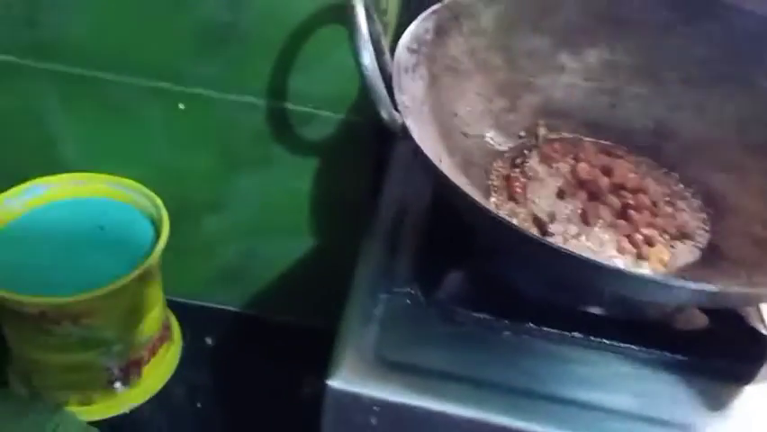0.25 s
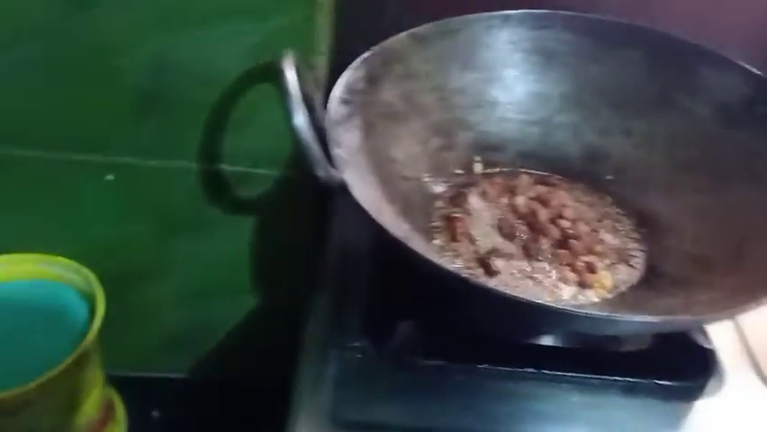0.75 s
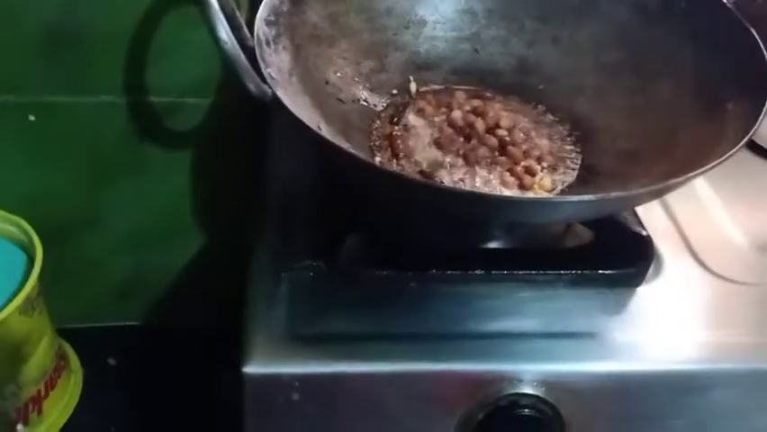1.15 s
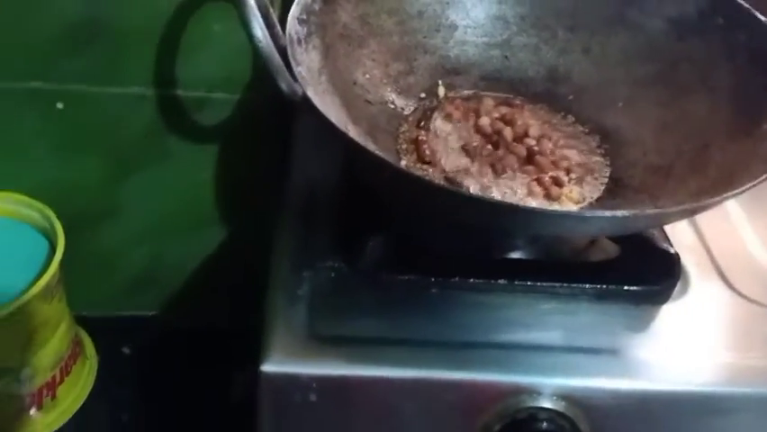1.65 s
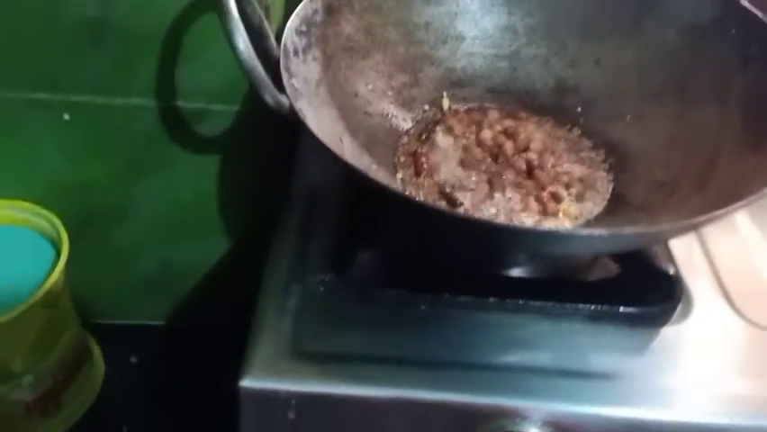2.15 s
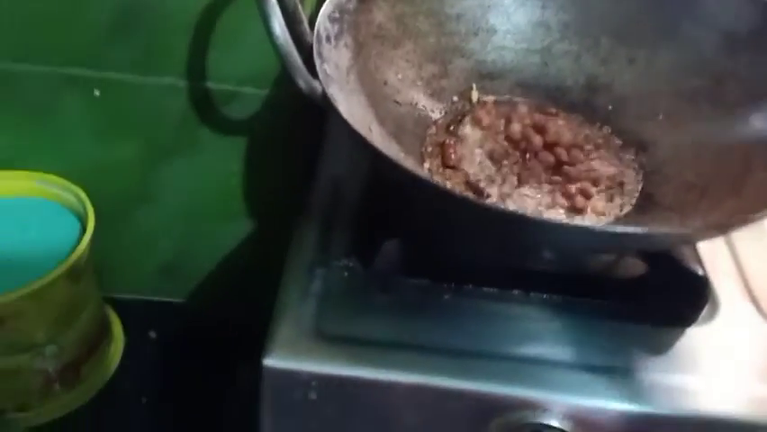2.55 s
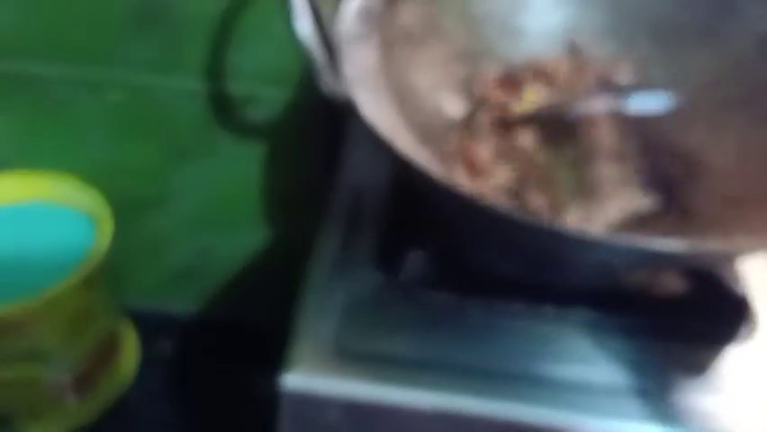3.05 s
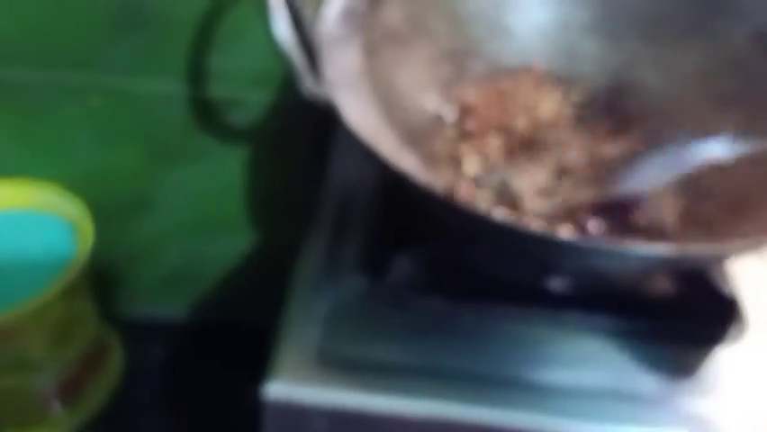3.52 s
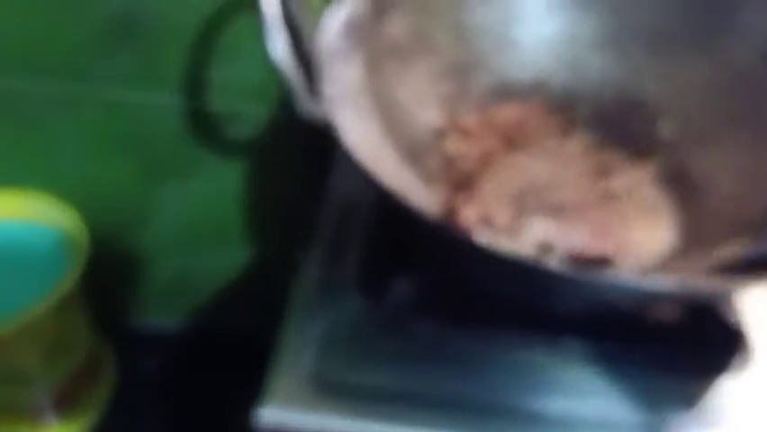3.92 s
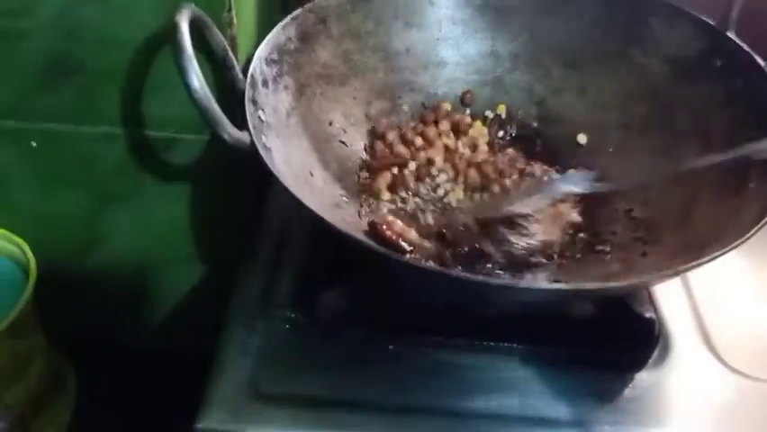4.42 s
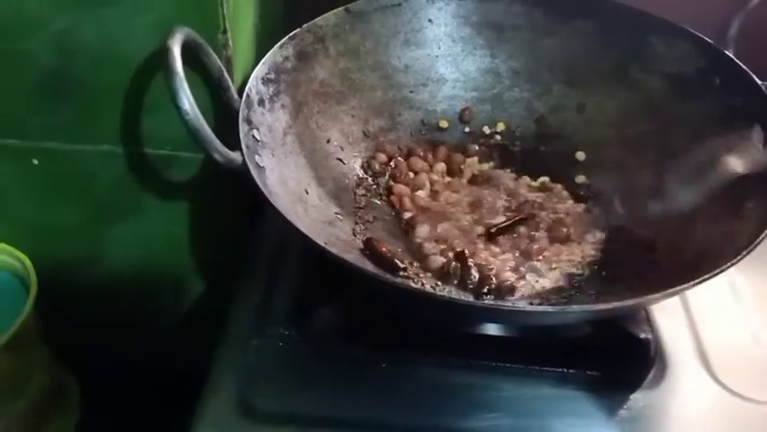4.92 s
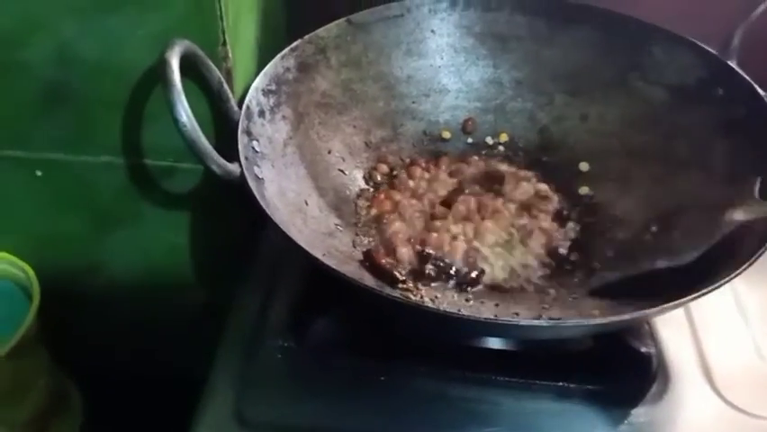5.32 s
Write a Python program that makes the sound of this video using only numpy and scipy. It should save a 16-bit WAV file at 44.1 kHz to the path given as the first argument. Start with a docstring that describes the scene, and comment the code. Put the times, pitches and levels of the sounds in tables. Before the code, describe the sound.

Peanuts fry in a steel pan with a soft fizz and sharp little spits of oil over a low burner murmur. About a second in, a piece of kitchenware clatters down to one side. Halfway through, a steel spatula starts stirring: it scrapes and knocks the pan, squeaks once, and the nuts tick as the sizzle swells. Heard close on a phone in a small kitchen.

```python
"""A small kitchen, heard close by a phone: peanuts fry in oil in a round steel pan. Bursting steam bubbles
make the oil fizz and spit over the burner's murmur. Kitchen ware clatters down at the side, three thin pings
sound, then a steel spatula stirs: nuts tick, blows ring the pan's modes, and stick-slip friction makes it
hum and squeal. The phone's two ports lift the sound near 2.4 and 5.5 kHz, the left one more, and its gain
control turns the level down after loud hits."""
import sys
import numpy as np
from scipy import signal
from scipy.fft import rfft, irfft, next_fast_len
from scipy.io import wavfile
from scipy.ndimage import uniform_filter1d, minimum_filter1d, map_coordinates

SR = 44100
rng = np.random.default_rng(int(sys.argv[2]) if len(sys.argv) > 2 else 0)


def output_pcm(signal):
    """Save a mono or channel-first signal as 16-bit PCM at the path in sys.argv[1].

    Samples are clipped to [-1, 1] before scaling.
    """
    pcm = np.clip(np.atleast_2d(signal).T, -1, 1) * 32767
    wavfile.write(sys.argv[1], SR, np.round(pcm).astype(np.int16))


N = 245637
STIR_S = 2.765  # the spatula starts

# Strength of the fizz, which grows as stirring turns wet nuts into the oil: time_s, level_db
FIZZ_LEVEL = [(0.0, -49.5), (0.4, -53.5), (0.85, -52.5), (1.5, -55), (2.1, -53), (2.6, -55.5),
              (2.74, -53.5), (2.9, -44), (3.09, -46), (3.35, -40), (3.55, -38), (3.75, -41.5), (4.1, -38),
              (4.3, -38.5), (4.68, -35.5), (4.9, -37.5), (5.05, -40.5), (5.25, -39.5), (5.57, -40.5)]
# Resonant response of the phone's ports: frequency_hz, gain_db
PORT_RESPONSE = [(530, -26), (900, -13), (1120, -15), (1220, -5), (1360, -16), (1550, -11), (2220, -3.5),
                 (2690, -3.5), (3380, -11.5), (4570, -6.5), (5610, 1.5), (7580, -15.5), (10600, -24.5),
                 (13800, -21.5), (16000, -30.5)]


def amp(db):
    """Amplitude ratio of a level in decibels."""
    return 10 ** (np.asarray(db) / 20)


def unit(x):
    """Normalisation to rms 1."""
    return x / np.sqrt(np.mean(x ** 2) + 1e-20)


def along(points, hz):
    """Interpolation of (frequency_hz, value) points on a logarithmic frequency axis."""
    point_hz, values = np.transpose(points)
    return np.interp(np.log(hz + 1), np.log(point_hz + 1), values)


def curves(rows):
    """Linear interpolation in time: one value per sample for each column after time_s."""
    time_s, *columns = np.transpose(rows)
    return [np.interp(np.arange(N) / SR, time_s, column) for column in columns]


def wobble(rate_hz):
    """Random modulation: a spline through rate_hz Gaussian knots a second."""
    knots = rng.standard_normal(int(N * rate_hz / SR) + 4)
    return map_coordinates(knots, [np.arange(N) * rate_hz / SR])


def filtered(x, response):
    """Linear filtering: the spectrum of x times a complex response of frequency."""
    size = x.shape[-1]
    padded = next_fast_len(size + 4096)
    return irfft(rfft(x, padded) * response(np.fft.rfftfreq(padded, 1 / SR)), padded)[..., :size]


def band(hz, lo_hz, hi_hz):
    """Band-pass magnitude with fourth-order slopes."""
    return 1 / np.sqrt((1 + (lo_hz / (hz + 1)) ** 8) * (1 + (hz / hi_hz) ** 8))


def resonance(hz, pitch_hz, width_hz):
    """Response of a damped oscillator, 1 at its natural frequency."""
    return hz * width_hz / (hz * width_hz + 1j * (hz ** 2 - pitch_hz ** 2))


def coloured(white, spectrum, lo_hz, hi_hz):
    """Spectral shaping of white sound within a band, at rms 1."""
    return unit(filtered(white, lambda hz: amp(along(spectrum, hz)) * band(hz, lo_hz, hi_hz)))


def noise(spectrum, size, lo_hz=1, hi_hz=30000):
    """Coloured noise on two uncorrelated paths, at rms 1."""
    return coloured(rng.standard_normal((2, size)), spectrum, lo_hz, hi_hz)


def burst(t60_s, room_db, room_t60_s, size):
    """Envelope of a transient: direct sound and reverberation decay exponentially and add in power."""
    t = np.arange(size) / SR
    room = amp(room_db - 60 * t / room_t60_s) * (1 - np.exp(-t / 0.0026))
    return np.hypot(amp(-60 * t / t60_s), room) * (1 - np.exp(-t / 0.00025))


def ring(modes, size, blur, clang_db=0, edge_db=0, favoured_hz=1):
    """Modal superposition: the place struck weights the damped modes; rattling blurs their phases."""
    t = np.arange(size) / SR
    hz, db, t60_s = np.transpose(modes)[:, :, None]
    lift_db = np.select([hz > 4500, hz > 1000], [edge_db, clang_db])
    lift_db = lift_db + 10 * np.exp(-(np.log2(hz / favoured_hz) / 0.18) ** 2)
    # a blow near the rim hardly moves the deepest mode
    lift_db -= 12 * ((hz < favoured_hz / 2) & (favoured_hz < 1000))
    level_db = db + lift_db + 2 * rng.standard_normal((2, len(modes), 1))
    drift = blur * np.cumsum(rng.standard_normal((len(modes), size)), axis=1)
    phase = 2 * np.pi * rng.random((2, len(modes), 1)) + drift * np.sqrt(hz / SR)
    rise = 1 - np.exp(-t * hz / 1.5)  # time constant of 1.5 cycles
    return np.sum(amp(level_db - 60 * t / t60_s) * rise * np.sin(2 * np.pi * hz * t + phase), axis=1)


def add(track, start_s, sound):
    """Superposition of a sound on the track from start_s."""
    start = round(start_s * SR)
    track[:, start:start + sound.shape[1]] += sound


def crackle(count, decay_cycles, spread_db, most_db):
    """Shot noise: damped sines of random time, pitch and size, reverberating in the bowl."""
    when, pitch, strength, *phases = rng.random((count, 5)).T[:, :, None]
    hz = 1200 * (15000 / 1200) ** pitch
    t = np.arange(256) / SR
    level_db = np.minimum(-spread_db * np.log(strength), most_db)
    envelope = amp(level_db) * hz * np.exp(-t * hz / decay_cycles)  # the factor hz whitens the spectrum
    samples = (when * N).astype(int) + np.arange(256)
    grains = [envelope * np.sin(2 * np.pi * (hz * t + phase)) for phase in phases]
    direct = np.array([np.bincount(samples.ravel(), path.ravel(), N + 256)[:N] for path in grains])
    bowl = amp(-20.5 - 60 * np.arange(2048) / SR / 0.14) * rng.standard_normal((2, 2048))
    return unit(direct + signal.fftconvolve(direct, bowl, axes=1)[:, :N])


def frying():
    """Bursting steam bubbles merge into broadband fizz; the finest spray follows it and comes in jets."""
    # Hissing jets of spray: start_s, length_s, level_db
    jets = [(1.674, 0.1, -61), (2.44, 0.15, -54), (3.307, 0.16, -55), (3.615, 0.14, -51),
            (4.508, 0.051, -41.5)]
    fizz_db, = curves(FIZZ_LEVEL)
    t = np.arange(N) / SR
    jetting = sum(amp(db) * np.clip(np.minimum(t - start_s, start_s + length_s - t) / 0.028, 0, 1)
                  for start_s, length_s, db in jets)
    bubbles = crackle(count=3000, decay_cycles=2.37, spread_db=9, most_db=18)
    wash = bubbles + rng.standard_normal((2, N))
    droplets = crackle(count=250, decay_cycles=4, spread_db=5.5, most_db=13)
    fizz = coloured(wash, PORT_RESPONSE, 1, 13400)
    spray = coloured(wash, PORT_RESPONSE, 13300, 30000)
    spray += amp(-4) * coloured(droplets, PORT_RESPONSE, 7900, 30000)
    spray_gain = (amp(-67 + 1.27 * (fizz_db - fizz_db.mean())) + jetting) * amp(0.23 * wobble(15))
    seething = amp(1.1 * wobble(17) + 0.8 * wobble(40))
    return seething * (amp(fizz_db) * fizz + spray_gain * spray)


def kitchen():
    """Ambient noise: burner and room murmur, fuller while the pan is busy, over a low rumble."""
    # Spectral densities of the murmur and the rumble: frequency_hz, level_db
    murmur_spectrum = [(53, -52), (90, -5), (250, 4.5), (377, 2), (441, 5), (672, -1.5), (770, 12),
                       (942, -4.5), (1020, 5.5), (1140, -6), (1600, -16), (2080, -42), (3520, -120)]
    rumble_spectrum = [(12, -44), (20, -14), (32, -19), (64, 6), (110, -1), (140, -17), (240, -120)]
    # Slow swell of the rumble: time_s, level_db
    rumble_level = [(0, -96), (.7, -80), (.87, -72), (1.05, -77), (1.6, -81), (2.7, -80.5), (5.57, -76)]
    fizz_db, = curves(FIZZ_LEVEL)
    murmur_db = -61 + 0.19 * (fizz_db - fizz_db.mean()) + wobble(5.33)
    murmur = amp(murmur_db) * noise(murmur_spectrum, N)
    rumble_db = curves(rumble_level)[0] + 4.5 * wobble(3.7)
    return murmur + amp(rumble_db) * noise(rumble_spectrum, N)


def small_spits(count):
    """A random point process: rows for pops(), their levels scattered about that of the fizz."""
    start_s = rng.random(count) * N / SR
    strength, pitch, body = rng.standard_normal((count, 3)).T
    snap_db = np.interp(start_s, *np.transpose(FIZZ_LEVEL)) + 2 * strength
    return list(zip(start_s, snap_db + 2, 4900 * np.exp(0.04 * pitch),
                    snap_db - 8 + 2 * body, snap_db, snap_db - 30, np.full(count, -10)))


def crack(pitch_hz, body_db, snap_db, air_db, lead):
    """A pressure impulse, lead samples in, that rings briefly; its peak is 1."""
    tilt = [(600, body_db + 4), (2400, body_db), (5500, snap_db), (12000, air_db + 10)]

    def response(hz):
        colour = amp(0.65 * along(PORT_RESPONSE, hz) + along(tilt, hz))
        ringing = 1 + 0.2 / 0.14 * resonance(hz, pitch_hz, 0.14 * pitch_hz)
        return np.outer([1, 1j], colour * ringing)  # the two paths are a quarter cycle apart

    pulse = filtered(signal.unit_impulse(4 * lead, lead), response)
    return pulse / np.abs(pulse).max()


def pops():
    """Impulsive excitation: a crack, then resonant noise whose highest band the room absorbs first."""
    # Spits of oil and clicks of nuts and blade; body, snap and air are the low, middle and high bands:
    # start_s, crack_db, pitch_hz, body_db, snap_db, air_db, tail_db (relative to the burst)
    spits = [(0.0685, -34, 5300, -42, -41, -67, -24), (0.1268, -36, 5820, -61, -38.5, -74, -9),
             (0.2175, -37, 6270, -44, -38, -77, -8.5), (0.2289, -32, 5240, -66, -47, -71, -20),
             (0.2695, -28.5, 6000, -48, -44, -60, -26), (0.3127, -40, 5410, -62, -43, -65, -24),
             (0.3585, -25, 5270, -42, -32.5, -43, -13), (0.4628, -51, 5100, -44.5, -44.5, -75, -5.5),
             (0.5493, -21, 2420, -29.5, -27.5, -48, -8), (0.9525, -29.5, 5300, -42, -37, -74, -10.5),
             (1.0217, -21, 4700, -48, -33.5, -108, -8.5), (1.467, -32, 2040, -51, -43, -55, -16),
             (1.8577, -21, 4900, -38.5, -36, -86, -5.5), (1.9404, -27, 5230, -47, -40, -43, -4.5),
             (2.1, -42, 5530, -54, -40, -58, -12), (2.2217, -29, 3920, -43, -39, -60, -9.5),
             (2.4198, -25, 5000, -48.5, -50, -70, -1), (2.46, -37, 5800, -53, -47, -57, -5),
             (2.4876, -33, 5070, -46, -43.5, -52, 2.5), (2.506, -38, 5100, -46, -41, -35, -6),
             (2.7137, -23, 5200, -41, -34.5, -71, -17), (2.7739, -17.5, 2660, -29, -26, -41.5, -11),
             (2.9944, -20, 2440, -44.5, -52, -56, 1), (3.0427, -28, 1920, -40, -53, -63, -6),
             (3.0535, -56, 5430, -30, -52, -65, -8), (3.266, -30, 2120, -29.5, -70, -48, -10),
             (3.3124, -24, 5300, -38, -47, -51, -24), (3.3474, -23, 5980, -34, -39, -34, -20),
             (3.3634, -39, 2180, -42, -48, -55, -24), (3.3764, -21, 2220, -44, -46, -55, -18),
             (3.3994, -30, 5400, -35, -36, -52, -20), (3.4212, -31, 5300, -46, -28, -42, -10),
             (3.4652, -20, 6260, -31.5, -27.5, -43, -10.5), (3.5416, -30, 5600, -33.5, -33.5, -42, 1),
             (3.5808, -47, 2260, -28.5, -57, -42, -10), (3.6183, -35, 4800, -41, -24.5, -38, -10.5),
             (3.6623, -18, 2090, -38, -59, -54, 6), (3.693, -26, 5510, -53, -22, -40, -10),
             (3.7254, -28, 5350, -39, -41, -50, -22), (3.7995, -36, 1820, -34, -32, -40, -7),
             (3.8272, -18, 1730, -33.5, -39, -43, -2), (3.896, -56, 5840, -66, -40.5, -64, 0),
             (3.936, -35, 2020, -23.5, -24.5, -38, -9.5), (3.9884, -7.5, 5250, -26.5, -27.5, -36, -4.5),
             (4.0479, -36, 5370, -68, -31.5, -62, -4.5), (4.1863, -28, 5370, -58, -26, -61, -8.5),
             (4.2248, -15, 5160, -35, -29, -43, -20), (4.3166, -29, 5900, -35, -30.5, -49, -5.5),
             (4.361, -38, 2250, -30, -35, -53, -17), (4.379, -22, 5140, -36, -30, -59, -11),
             (4.4533, -22, 4800, -34, -28, -51, -4), (4.4812, -33, 5100, -31, -36.5, -53, 3.5),
             (4.595, -30, 5140, -27, -31, -58, -6), (4.6194, -16, 5660, -29.5, -35, -48, -18),
             (4.665, -18, 5680, -37, -18.5, -48, -10), (4.6824, -16, 2180, -27, -23.5, -38, -8.5),
             (4.6924, -24, 5440, -38, -39, -43, -22), (4.7085, -22, 5300, -24, -28, -46, -19),
             (4.7621, -12, 5200, -23, -26, -63, -11), (4.7896, -13, 5430, -31, -28, -58, -10),
             (4.8274, -32, 5230, -51, -31, -55, -24), (4.9072, -39, 2390, -30, -32, -55, -22),
             (4.9214, -30, 2200, -35, -33, -55, -21), (4.9468, -37, 5200, -34.5, -35, -34, 1.5),
             (5.0539, -19, 5440, -29, -26.5, -44, -27), (5.0624, -47, 5790, -63, -36, -53, -21),
             (5.0912, -41, 5700, -29, -31, -42, -11), (5.1125, -23, 2630, -33, -28.5, -57, 1),
             (5.176, -20, 5260, -42, -30.5, -52, -1.5), (5.1885, -23, 5760, -24, -28, -39, -12),
             (5.2216, -19, 4960, -30.5, -28, -42, -3), (5.2606, -20, 5760, -44, -48, -70, -6),
             (5.2834, -25, 5600, -41, -29, -58, -10), (5.3478, -32, 4970, -35, -31, -52, -13),
             (5.4327, -2.5, 2560, -23, -15, -23, -5)]
    track, size, lead = np.zeros((2, N + SR)), SR // 6, 64
    for start_s, crack_db, pitch_hz, body_db, snap_db, air_db, tail_db in list(spits) + small_spits(6):
        body = amp(body_db) * noise(PORT_RESPONSE, size, hi_hz=3120) * burst(0.035, tail_db, 0.16, size)
        snap = amp(snap_db) * noise(PORT_RESPONSE, size, 3200, 10600) * burst(0.038, tail_db, 0.28, size)
        air = amp(air_db) * noise(PORT_RESPONSE, size, lo_hz=8450) * burst(0.015, -3, 0.09, size)
        pitched = filtered(body + snap, lambda hz: 0.6 + 1.418 * resonance(hz, pitch_hz, 0.066 * pitch_hz))
        add(track, start_s, pitched + air)
        pulse = crack(pitch_hz, body_db, snap_db, air_db, lead)
        add(track, max(start_s - lead / SR, 0), amp(crack_db) * pulse)
    return track[:, :N]


def clatter():
    """Impacts of hollow ware bouncing on the counter excite short modes, a rattle and reverberation."""
    # Bounces: start_s, level_db, treble_db and ring_db (relative to the rattle), clang_db, edge_db,
    # burst_t60_s, ring_time_ratio, favoured_hz
    bounces = [(1.111, -14.5, -6.5, 2, -2.5, 2, 0.094, 0.42, 980),
               (1.114, -23.5, -3, -1, 6, 1, 0.066, 0.85, 2480),
               (1.136, -21.5, -18, -2, -4, -2, 0.02, 0.38, 2770),
               (1.189, -27.5, -1, -8, -3.5, 10, 0.0049, 4.2, 1000),
               (1.2685, -22.5, -11, 3.5, -0.5, -4, 0.062, 0.51, 1740),
               (1.289, -32.5, 8, -4, 4, 3, 0.014, 1.4, 2020),
               (1.328, -27, -10.5, -10, 5.5, -6, 0.27, 1.17, 1040),
               (1.36, -25.5, -6.5, -5, 3.5, 8, 0.09, 0.89, 2030),
               (1.562, -50, -25, -13, 3, 3, 0.047, .4, 650)]
    # Free modes of the ware: pitch_hz, level_db, t60_s
    ware_modes = [(176, -36, 0.1), (635, -14, 0.28), (850, -17, 0.14), (970, -17, .15), (1041, -13, 0.2),
                  (1640, -10, 0.17), (1690, -11, .1), (1930, -9, .11), (2040, -10, 0.11), (2175, -7, .13),
                  (2295, -5, 0.24), (2515, -7, 0.2), (2580, -8, .2), (2850, -9, 0.13), (3025, -9, .08),
                  (5070, -12, 0.06), (5370, -15, 0.18)]
    # Spectral densities: frequency_hz, level_db
    rattle_spectrum = [(300, -18), (700, -1), (1100, 3), (1500, 1.5), (2400, 8), (3300, -1.5),
                       (4000, -38)]
    treble_spectrum = [(3000, -29), (3500, -1.5), (4500, 1), (5400, 3.5), (6500, -14), (8000, -24),
                       (15000, -47)]
    track, size = np.zeros((2, N + SR)), SR // 3
    for start_s, db, treble_db, ring_db, clang_db, edge_db, t60_s, time_ratio, favoured_hz in bounces:
        rattle = noise(rattle_spectrum, size) * burst(t60_s, -12.5, 0.4, size)
        treble = noise(treble_spectrum, size) * burst(t60_s, -12.5, 0.3, size)
        modes = np.multiply(ware_modes, [1, 1, time_ratio])
        ringing = ring(modes, size, 0.1, clang_db, edge_db, favoured_hz)
        add(track, start_s, amp(db) * (rattle + amp(treble_db) * treble + amp(ring_db) * ringing))
    return track[:, :N]


def pings():
    """Free decay of very high modes: three thin pings."""
    # Modes of a ping: pitch_hz, level_db, t60_s
    ping_modes = [(10930, -10, .25), (13260, 3, .16), (13860, -2, .55)]
    track = np.zeros((2, N))
    for start_s in (2.455, 2.498, 2.53):
        add(track, start_s, amp(-56) * ring(ping_modes, SR // 5, blur=0.11))
    return track


def knocks():
    """Free vibration: each blow of the spatula leaves the pan ringing in its modes."""
    # Blows on the pan: start_s, level_db, clang_db, edge_db, favoured_hz
    blows = [(2.765, -46.5, 4.5, 9, 2140), (2.776, -52.5, 11.5, 18, 2700), (2.79, -59, 19, 8, 4160),
             (2.792, -45, 0, -3, 265), (2.854, -43.5, -1.5, -15, 745), (3.053, -39.5, -33, 6, 745),
             (3.056, -53, -10, -10, 246), (3.615, -40, -9, -11, 745), (3.646, -36.5, -1, 1.5, 750),
             (4.706, -34, -5, -7, 745), (5.136, -37, -7, -5, 745), (3.456, -56.5, 1, 12, 265),
             (3.682, -57, -5, -13, 265), (4.005, -75, -2, -22, 265), (4.03, -66, -34, -10, 265),
             (4.161, -48, 12, 6, 4060), (4.392, -64, 18, 20, 265), (4.623, -53.5, 8, 20, 265),
             (4.715, -55, -6, 3, 265), (5.11, -43.5, 5, -6, 2580), (5.426, -54, 26, 31, 2270),
             (5.4308, -47.5, 25, 32, 2640)]
    # Modes of the steel pan: pitch_hz, level_db, t60_s
    pan_modes = [(264.7, 1.5, 0.2), (490, -9, 0.09), (745, -5, 0.06), (2025, -12, .15), (2130, -7, .15),
                 (2240, -4, 0.09), (2500, -11, .1), (2640, -4, 0.12), (3080, -14, .07), (4040, -12, 0.13),
                 (4157, -16, .3), (5130, -4, 0.18), (5250, -3, .1), (5490, -4, 0.1), (5690, -9, .13),
                 (6105, -5, .14), (6280, -7, 0.13), (6655, -6, .11), (7155, -8, 0.09)]
    track = np.zeros((2, N + SR))
    for start_s, db, clang_db, edge_db, favoured_hz in blows:
        add(track, start_s, amp(db) * ring(pan_modes, SR // 5, 0.1, clang_db, edge_db, favoured_hz))
    return track[:, :N]


def stirring(over_fizz_db):
    """Amplitude envelope of the nuts' motion: zero until stirred, then proportional to the fizz."""
    return (np.arange(N) > STIR_S * SR) * amp(curves(FIZZ_LEVEL)[0] + over_fizz_db)


def ticks():
    """Brief contacts of nuts tumbling against each other and the steel radiate sparse clicks."""
    clicks = crackle(count=500, decay_cycles=3.8, spread_db=7, most_db=16)
    return stirring(-6.5) * coloured(clicks, PORT_RESPONSE, 1200, 7500)


def hum(pitch_hz, width_hz):
    """One resonance driven by white noise, at rms 1."""
    return unit(filtered(rng.standard_normal((2, N)), lambda hz: resonance(hz, pitch_hz, width_hz)))


def scrapes():
    """Forced vibration: stick-slip noise drives the pan's low modes; stirred nuts keep the rim humming."""
    # Strokes of the spatula on steel: strongest_contact_s, bowl_db, rim_db
    strokes = [(2.831, -46.5, -59), (3.08, -50, -60), (3.2, -101, -48.5), (3.46, -58, -111),
               (3.68, -52, -64), (3.71, -53, -98), (4.009, -49.5, -64), (4.18, -63, -55),
               (4.31, -60.5, -55), (4.39, -54.5, -55.5), (4.49, -55.5, -49.5), (4.63, -56, -50.5),
               (4.718, -50, -54.5), (4.86, -66, -54.5), (5.139, -48.5, -45), (5.469, -46, -52)]
    rise_s, fall_s = 0.15, 0.27  # each spans 60 dB
    contact_s, bowl_db, rim_db = np.transpose(strokes)[:, :, None]
    since_s = np.arange(N) / SR - contact_s
    contact = amp(60 * np.minimum(since_s / rise_s, -since_s / fall_s))
    bowl = np.sum(amp(bowl_db) * contact, axis=0) * (hum(248, 72) + amp(-8.5) * hum(446, 44))
    rim = (np.sum(amp(rim_db) * contact, axis=0) + stirring(-22.5)) * hum(745.5, 30)
    return (bowl + rim) * amp(2 * wobble(25))


def squeal():
    """Friction of the blade on the rim: a gliding tone, roughened by phase and amplitude modulation."""
    # Course of the squeal: time_s, pitch_hz, level_db
    glide = [(3.49, 788, -70), (3.502, 813, -56), (3.54, 823, -42), (3.554, 730, -39.5), (3.59, 725, -70)]
    pitch_hz, level_db = curves(glide)
    t = np.arange(N) / SR
    sounding = (t > glide[0][0]) & (t < glide[-1][0])
    tone = np.sin(2 * np.pi * np.cumsum(pitch_hz) / SR + wobble(60))
    return np.outer([1, 0.6], sounding * amp(level_db + 2.8 * wobble(40.4)) * tone)


def at_ports(paths, coherence, lag_s):
    """Partial coherence: two uncorrelated paths mix as mid and side; the left port hears lag_s later."""
    angle = lambda hz: np.arccos(np.clip(along(coherence, hz), -1, 1)) / 2
    mid, side = filtered(paths, lambda hz: np.array([np.cos(angle(hz)), np.sin(angle(hz))]))
    delays = lambda hz: np.exp(-1j * np.pi * np.outer([lag_s, -lag_s], hz))
    return filtered(np.array([mid + side, mid - side]), delays)


def gain_control(x, threshold_db=-31.5, cut_share=0.22, hold_s=0.72, recovery_db_per_s=8):
    """Compression: the gain drops by a share of the excess level, holds, then creeps back up."""
    power = np.abs(uniform_filter1d(np.mean(x ** 2, axis=0), size=1024))
    cut_db = cut_share * np.maximum(10 * np.log10(power + 1e-12) - threshold_db, 0)
    half_hold = round(hold_s * SR / 2)
    held_db = -minimum_filter1d(np.pad(-cut_db, (half_hold, 0)), size=2 * half_hold + 1)[:N]
    recovery_db = recovery_db_per_s * np.arange(N) / SR
    return x * amp(recovery_db - np.maximum.accumulate(held_db + recovery_db))


def scene():
    """Superposition at two ports, coherent mainly in the bass; the ware reaches the right one first."""
    # Likeness of left and right for sound from ahead and from the side: frequency_hz, coherence_ratio
    ahead_coherence = [(60, 0.76), (180, 0.99), (550, 0.79), (1650, 0.37), (4970, 0.0038), (15000, 0.047)]
    side_coherence = [(200, 0.77), (1000, 1), (3000, 0.04), (6000, 0.15)]
    low_cut = lambda x: filtered(x, lambda hz: band(hz, 132, SR))
    ahead = frying() + ticks() + low_cut(pops() + knocks() + scrapes()) + squeal() + pings() + kitchen()
    aside = low_cut(clatter())
    return at_ports(ahead, ahead_coherence, lag_s=0.00003) + at_ports(aside, side_coherence, lag_s=0.00014)


def record(dry):
    """The phone's transfer: unequal port sensitivity, bass roll-off, compression and a band limit."""
    # Sensitivity of the left port over the right: frequency_hz, difference_db
    imbalance = [(60, 0), (130, 1), (290, -1), (640, 0), (1410, 3.5), (3100, 5), (6820, 6), (15000, -4)]
    sensitivity = lambda hz: amp(np.outer([0.5, -0.5], along(imbalance, hz)))
    heard = filtered(dry, lambda hz: sensitivity(hz) * band(hz, 44.7, SR) ** 0.24)
    return filtered(gain_control(heard), lambda hz: hz < 15800)


dry = scene()
out = record(dry)
output_pcm(out)
```